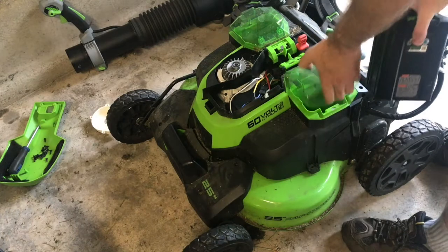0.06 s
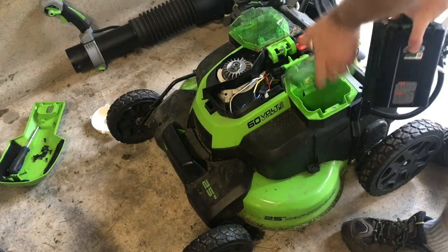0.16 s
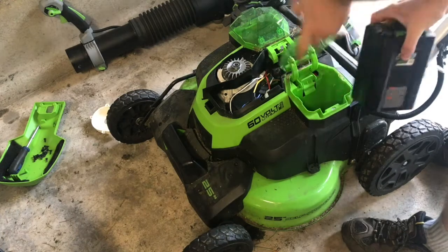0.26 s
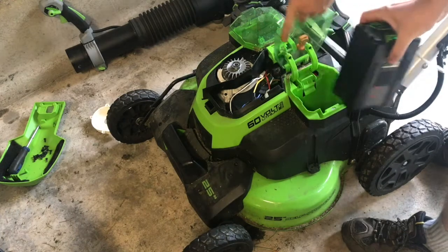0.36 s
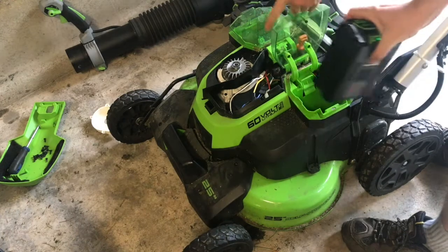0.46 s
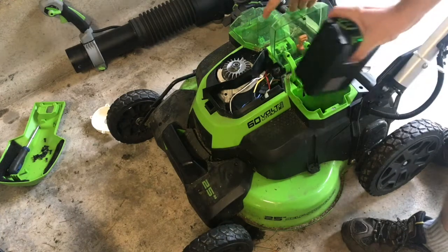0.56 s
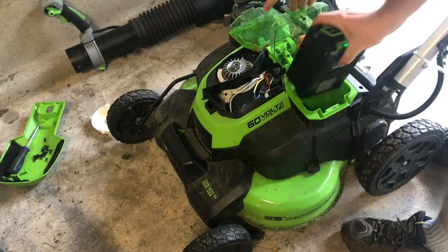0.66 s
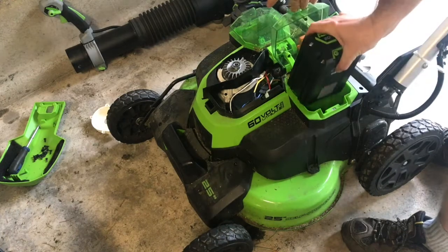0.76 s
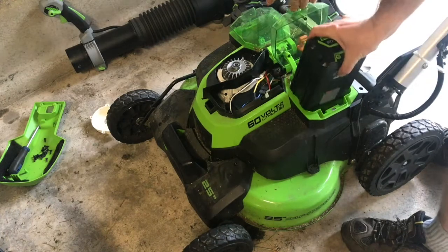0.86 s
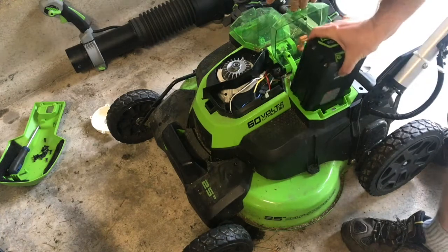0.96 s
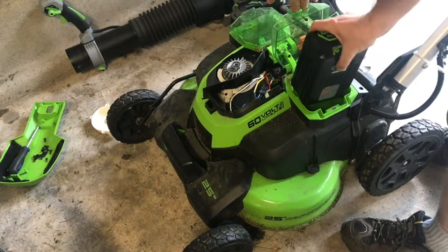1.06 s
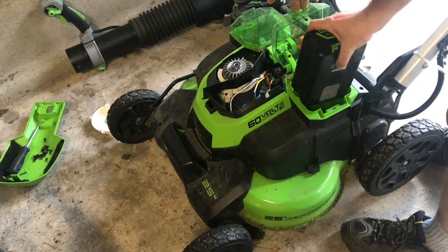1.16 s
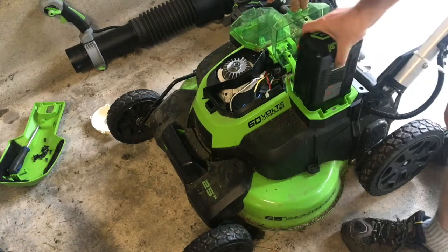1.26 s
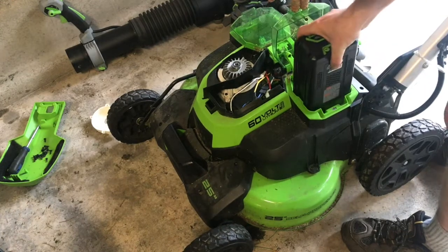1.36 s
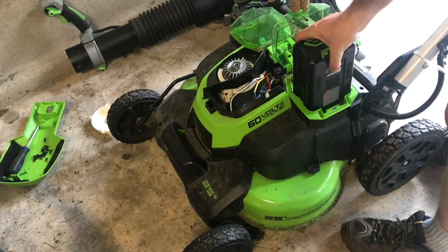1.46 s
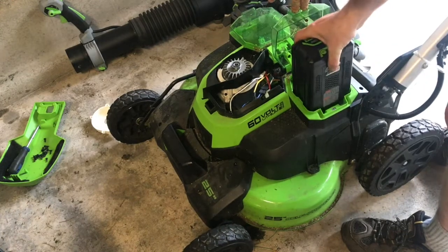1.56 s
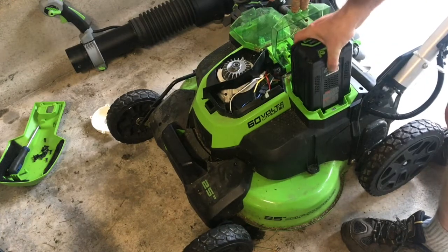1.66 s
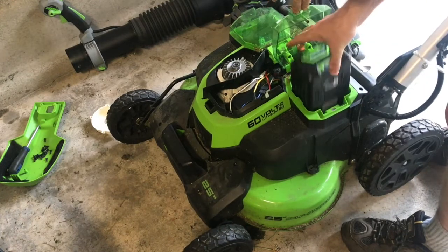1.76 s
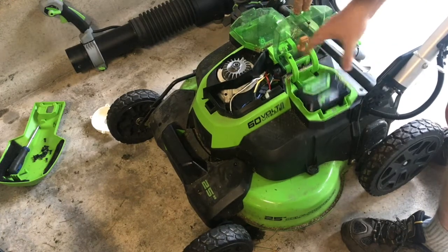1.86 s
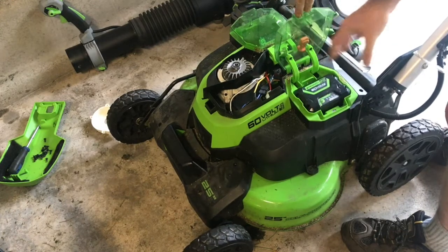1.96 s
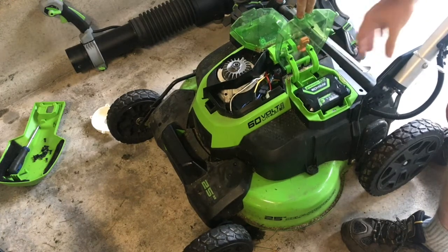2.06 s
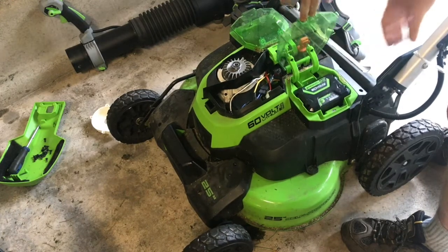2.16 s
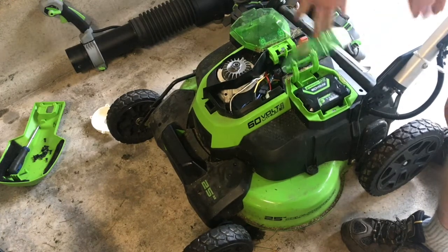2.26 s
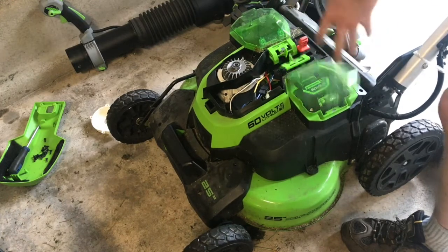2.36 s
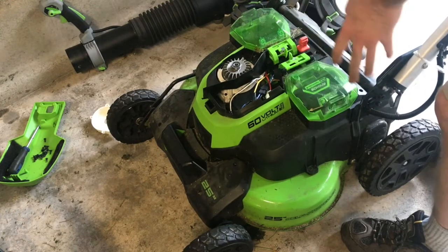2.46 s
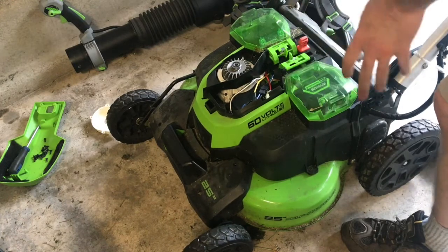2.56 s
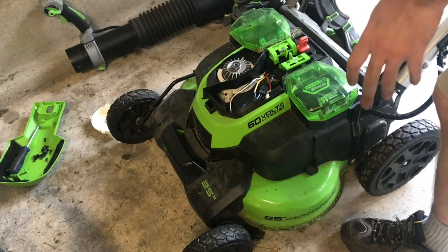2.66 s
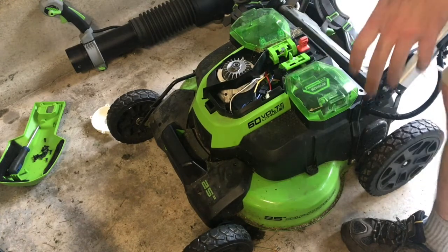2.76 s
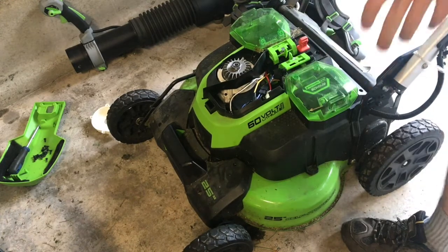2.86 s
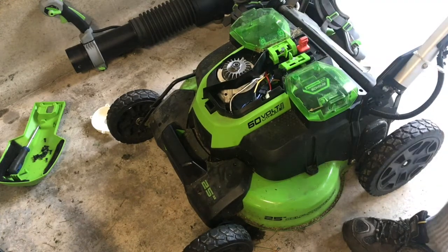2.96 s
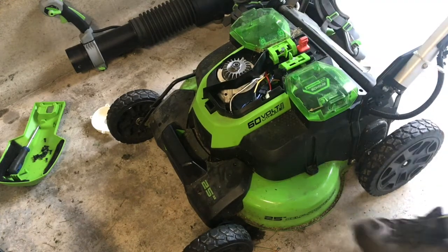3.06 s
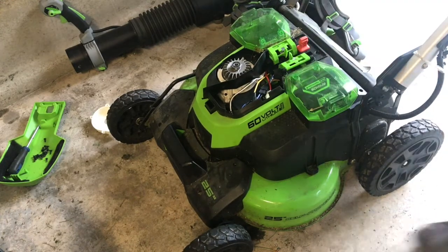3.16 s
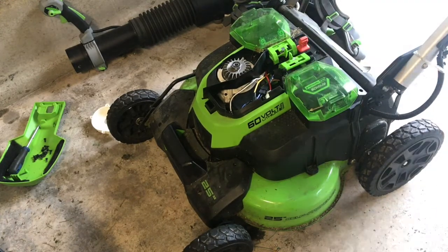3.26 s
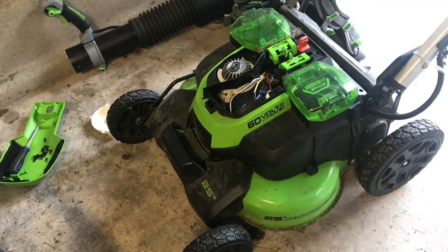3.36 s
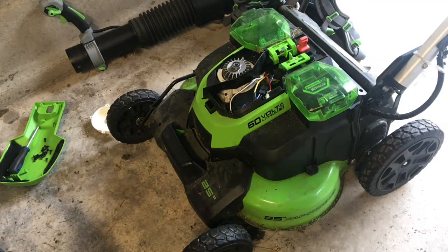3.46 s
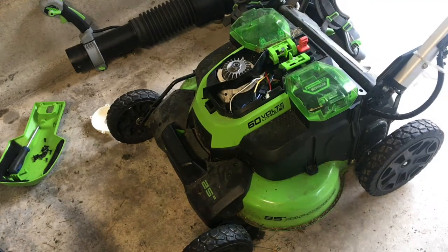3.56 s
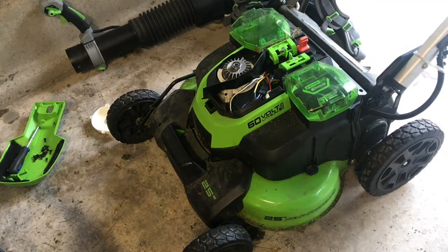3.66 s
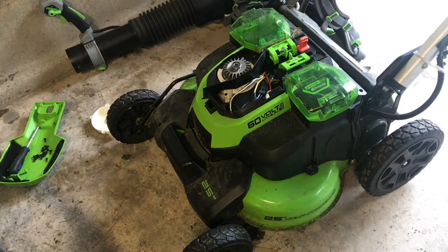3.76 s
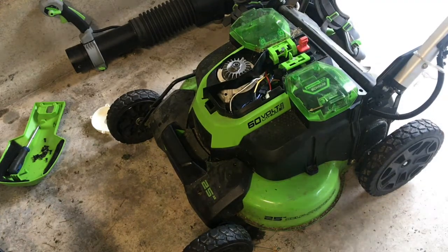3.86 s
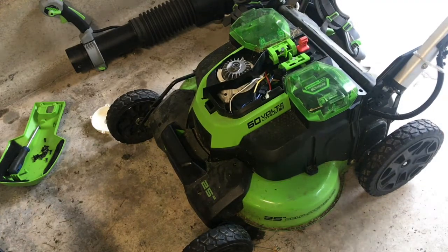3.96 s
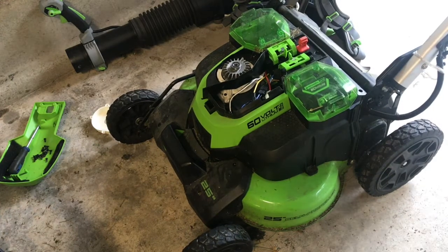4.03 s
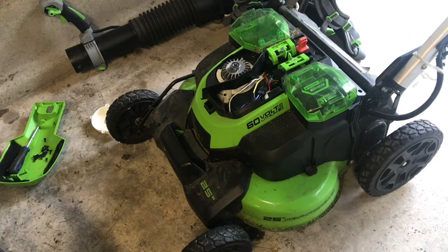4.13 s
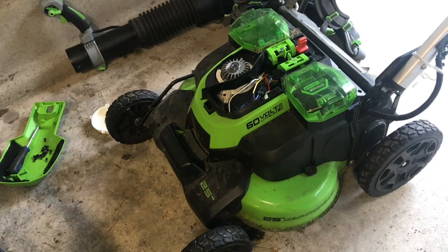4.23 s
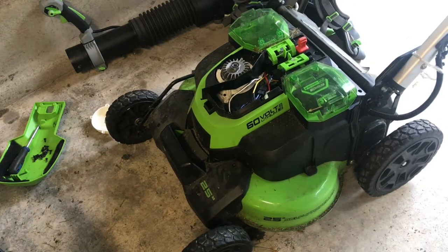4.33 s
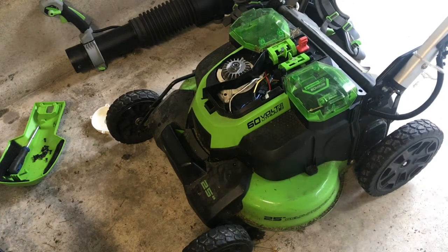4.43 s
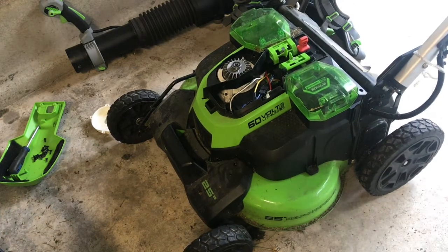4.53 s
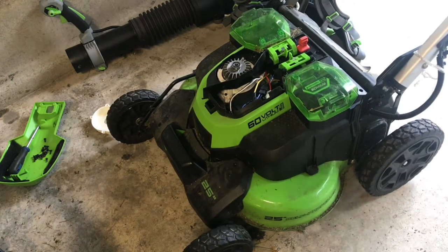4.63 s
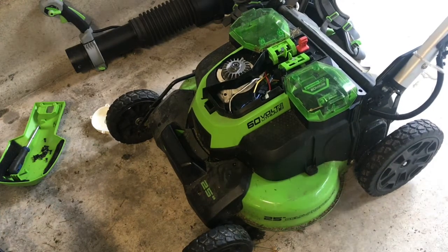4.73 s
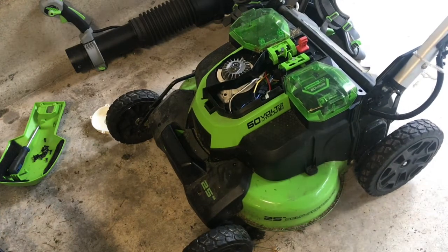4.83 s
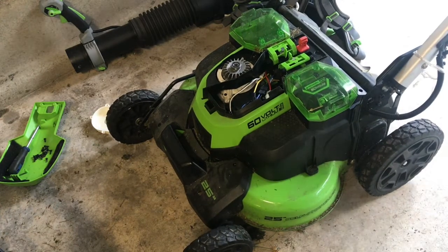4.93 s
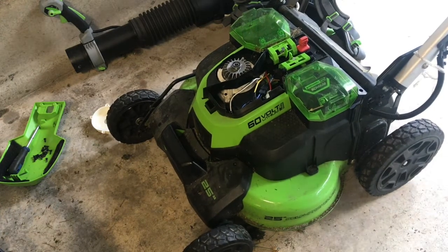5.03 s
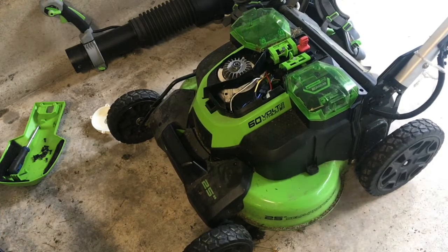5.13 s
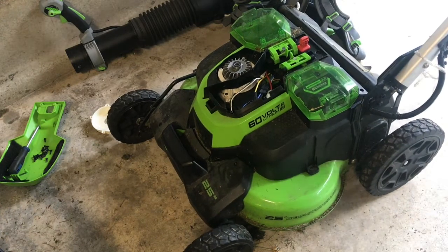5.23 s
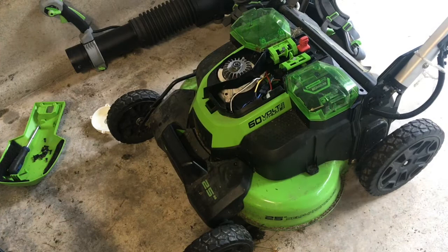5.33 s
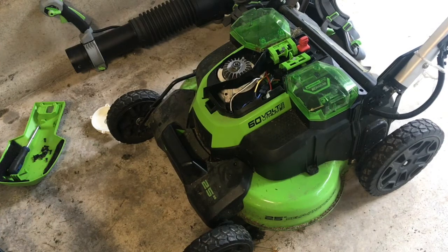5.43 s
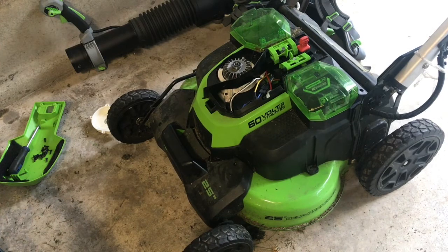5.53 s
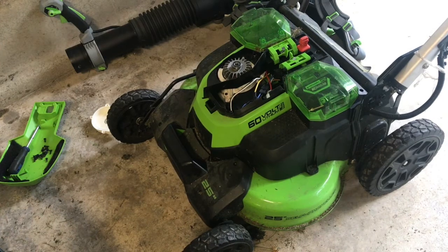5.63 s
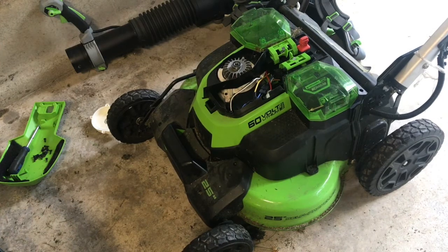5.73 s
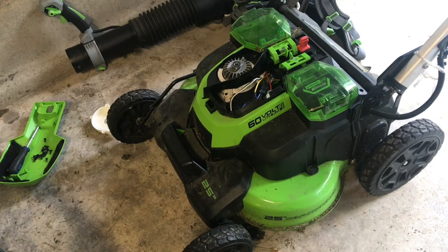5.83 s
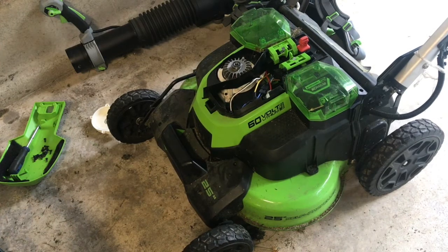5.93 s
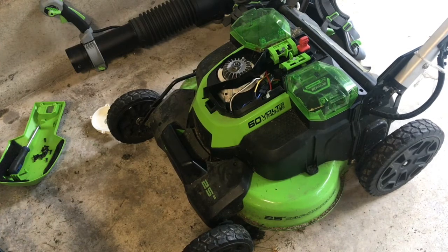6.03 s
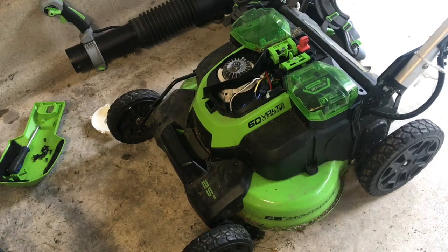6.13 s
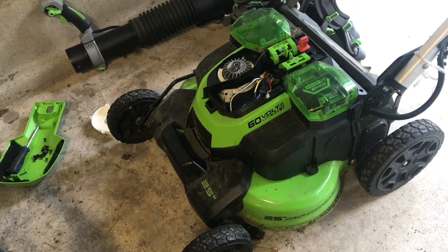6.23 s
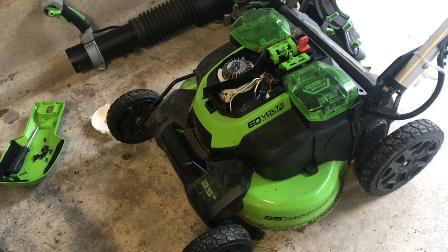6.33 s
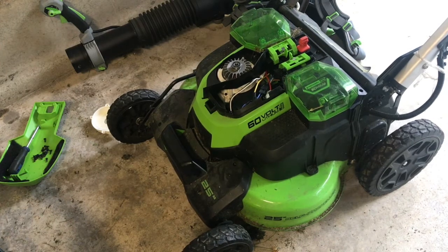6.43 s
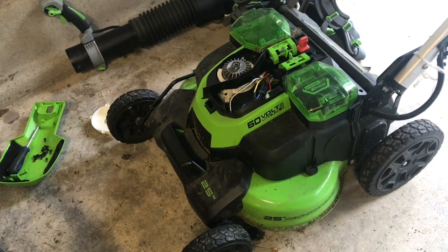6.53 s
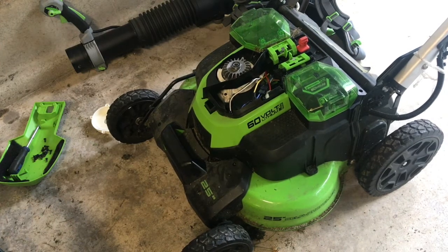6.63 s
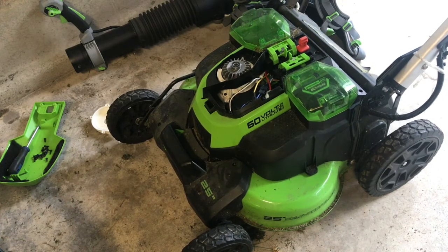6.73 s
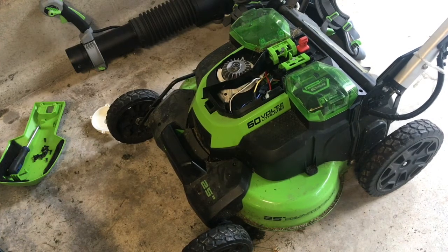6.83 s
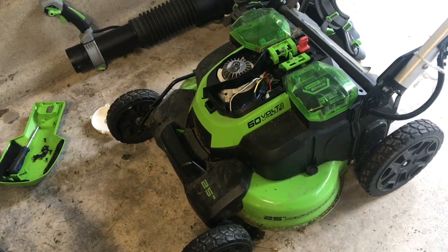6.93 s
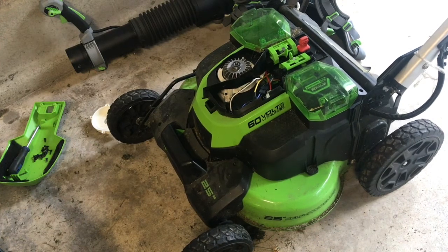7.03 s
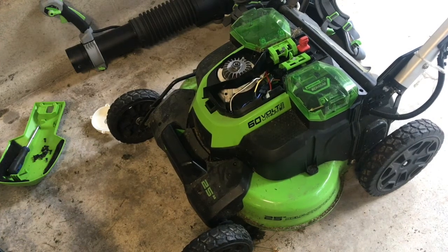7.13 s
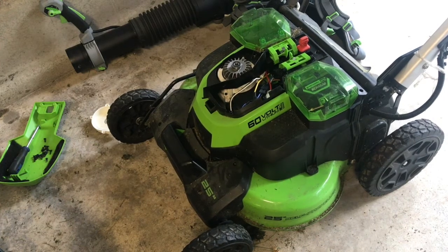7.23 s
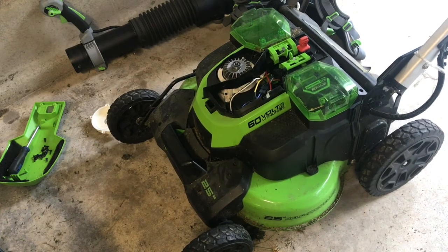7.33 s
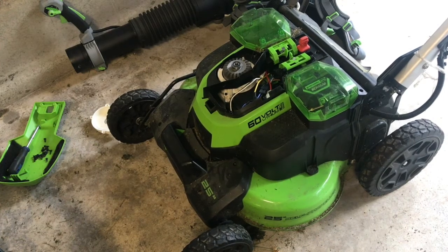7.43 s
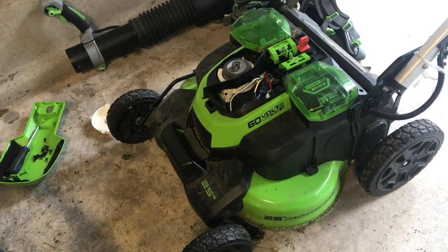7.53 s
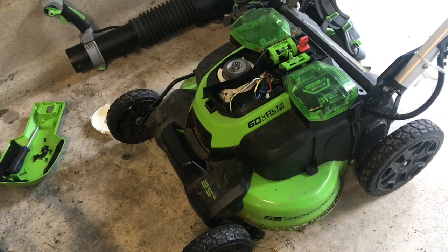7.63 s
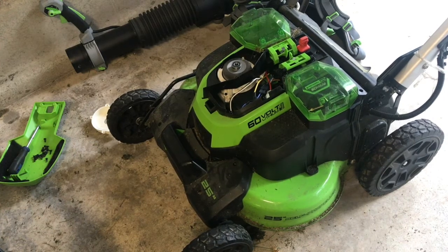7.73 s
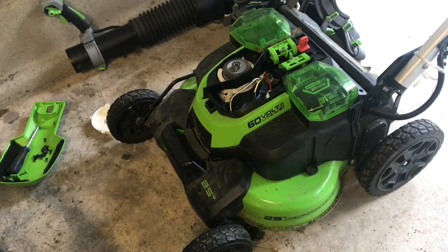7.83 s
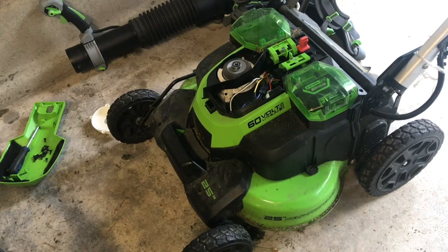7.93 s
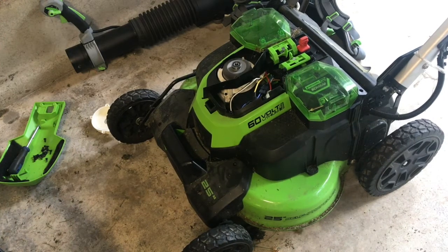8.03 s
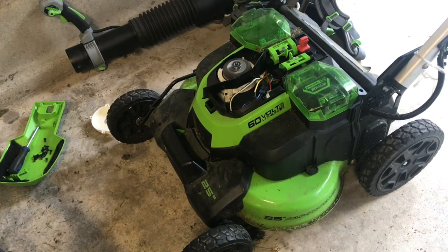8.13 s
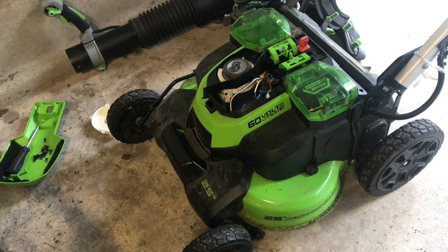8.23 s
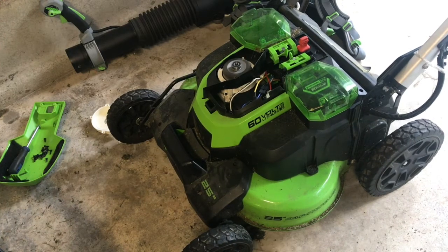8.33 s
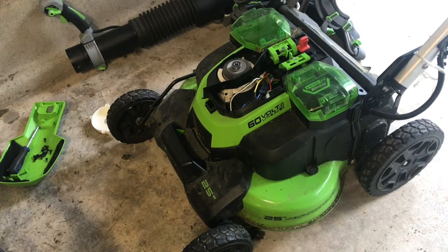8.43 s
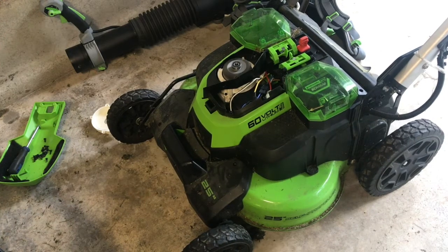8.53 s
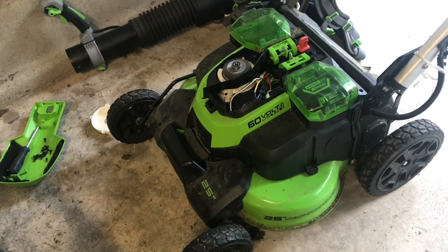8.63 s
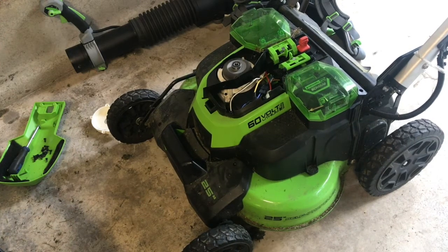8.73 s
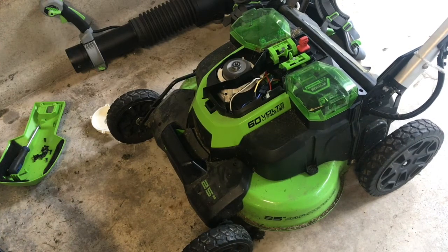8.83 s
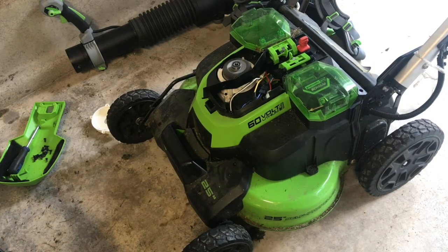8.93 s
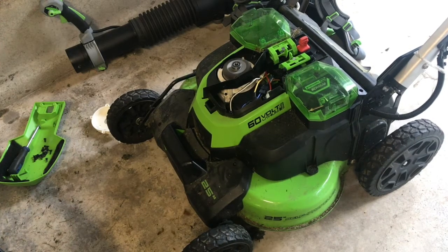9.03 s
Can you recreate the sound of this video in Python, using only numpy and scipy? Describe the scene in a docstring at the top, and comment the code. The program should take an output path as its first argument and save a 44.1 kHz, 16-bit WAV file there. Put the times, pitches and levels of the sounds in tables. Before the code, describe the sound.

A battery clunks into a mower's plastic bay and the lid slaps shut; footsteps, scuffs and handle clicks, then the motor spins up clattering.

```python
"""Over a low rumble, a drone and thin hiss, a lid flips open, a battery bumps down into its bay and latches,
and the lid slaps shut. Shoes step and scuff; the mower's handle, switch and bail click. The level steps down,
then the motor spins up: its drive clacks once a turn, ever faster, over the rising hum of the blades.
Blows are noise bursts rung through resonances, rubs are filtered grains, and the hum is a sum of sines."""
import sys
import numpy as np
from scipy import signal
from scipy.io import wavfile

SR = 44100
rng = np.random.default_rng(int(sys.argv[2]) if len(sys.argv) > 2 else 0)


def digitize_waveform(pressure):
    """Quantize a signal to 16-bit integers and store it at the path in sys.argv[1].

    Rows of a 2-D input are taken as channels; values are limited to [-1, 1].
    """
    field = np.atleast_2d(pressure).T
    bounded = np.clip(field, -1, 1)
    quanta = np.round(bounded * 32767).astype(np.int16)
    wavfile.write(sys.argv[1], SR, quanta)


N = 400869
TIME = np.arange(N) / SR  # seconds

# How a blow of hardness 0 sounds on plastic. Each row: frequency in Hz, relative level in dB.
PLASTIC_BLOW = [(30, -33.5), (90, -9), (300, -1.5), (800, -3), (1700, -4.5), (4200, -6.5), (10500, -13.5),
                (16000, -20)]
# What the handle rings with. Each row: frequency in Hz, width in Hz, height in dB.
HANDLE_RING = [(3250, 130, 0.7), (6460, 790, 7.9), (8670, 870, 6.6), (11400, 750, 8.9)]

STEP_S, STEP_DB, RUMBLE_STEP_DB = 6.89, -28, -14  # the rumble steps down less than the other early sounds
# The motor's soft start: start in s, time from there to half speed in s, steepness, speed it heads for
MOTOR_ON_S, HALF_SPEED_S, RAMP_POWER, TOP_TURNS_PER_S = 6.984, 1.122, 2.667, 77.4
ENGAGE_S = 7.35  # the running noise of the drive and the whine start here


def gain_of(db):
    """Turns decibels into amplitude."""
    return 10 ** (np.asarray(db) / 20)


def evened(x):
    """Scales a sound to rms 1."""
    return x / np.sqrt(np.mean(x ** 2) + 1e-20)


def read(points, hz):
    """Reads a table between its rows, along log frequency."""
    f, value = np.transpose(points)
    return np.interp(np.log(hz + 1), np.log(f + 1), value)


def add(mix, s, sound):
    """Mixes a sound in at time s."""
    part = mix[round(s * SR):][:len(sound)]
    part += sound[:len(part)]


def band(x, edges, order=3):
    """Keeps the frequencies between two edges, using only past samples."""
    edges = np.minimum(edges, SR / 2 - 1)
    return signal.sosfilt(signal.butter(order, edges, "band", fs=SR, output="sos"), x)


def colour(x, spectrum, peaks=(), size=8192):
    """Filters by a spectrum and its resonances, without pre-echo; white noise keeps its power."""
    hz = abs(np.fft.fftfreq(size, 1 / SR))
    db = read(spectrum, hz)
    for f, width, height in peaks:
        db = db + height / (1 + (2 * (hz - f) / width) ** 2)
    # Minimum phase: the ring starts at once and only dies away
    log_response = np.conj(signal.hilbert(np.log(gain_of(db))))
    ring = np.fft.ifft(np.exp(log_response)).real[:size // 2]
    return signal.oaconvolve(x, ring / np.linalg.norm(ring))[:len(x)]


def resonate(x, hz, width):
    """A resonance of gain 1 that follows the curve hz."""
    turn = np.exp(2j * np.pi * np.cumsum(hz) / SR)
    r = np.exp(-np.pi * width / SR)
    return 2 * (turn * signal.lfilter([1 - r], [1, -r], x / turn)).real


def noise():
    """White noise of rms 1."""
    return rng.standard_normal(N)


def drift(per_s):
    """Slow random wandering of rms 1, with this many new values a second."""
    knots = np.arange(0, 10, 1 / per_s)
    return evened(np.interp(TIME, knots, noise()[:len(knots)]))


def swell(s, length, db, edge_s):
    """Rises to a level at time s, holds for the length and fades; each edge covers 20 dB in edge_s."""
    outside = np.maximum(abs(TIME - s - length / 2) - length / 2, 0)
    return gain_of(db - 20 * np.minimum(outside / edge_s, 10))


def stroke(s, length, db):
    """The envelope of a rub: longer strokes start and stop more gently."""
    return swell(s, length, db, 0.021 + 0.14 * length)


def garage(early_db, tail_db, early_t60=0.2):
    """The room's answer to a click: quick reflections off floor and walls, and a longer tail."""
    # How long the tail takes to fade by 60 dB. Each row: frequency in Hz, time in seconds.
    fade_times = [(100, 0.46), (400, 0.49), (800, 0.74), (3000, 0.67), (6000, 0.6), (10000, 0.36),
                  (16000, 0.12)]
    t = np.arange(SR) / SR
    first, late = rng.standard_normal((2, SR)) * (t > .005)
    early = evened(first * gain_of(-60 * t / early_t60))
    hz, frame_s, z = signal.stft(late, SR, nperseg=256)
    fade = gain_of(-60 * frame_s / read(fade_times, hz)[:, None])
    tail = evened(signal.istft(z * fade, SR, nperseg=256)[1][:SR])
    return (gain_of(tail_db) * tail + gain_of(early_db) * early) / np.sqrt(SR)


def echoed(x, room):
    """A sound with its reflections."""
    return x + signal.oaconvolve(x, room)[:N]


def blows(rows, spectrum, resonances, t60, crack, early_db, tail_db):
    """A crack, a short dense clatter and echoes, rung through the object; a harder blow is brighter."""
    out, t = np.zeros(N), np.arange(SR) / SR
    for s, db, hardness in rows:
        contact = rng.standard_normal(SR) * (gain_of(-60 * t / t60) + crack * np.exp(-t / 0.0009))
        contact /= np.linalg.norm(contact)
        # Hardness tilts the treble above 300 Hz
        tilted = [(hz, height + hardness * np.log2(max(hz / 300, 1))) for hz, height in spectrum]
        sound = colour(contact + garage(early_db, tail_db), tilted, resonances)
        add(out, s, gain_of(db) * sound / np.std(sound[:SR // 50]))  # level set over the first 20 ms
    return out


def grains():
    """Sparse grains of uneven size, as when grit is crushed or rails rub."""
    sizes_db = 1.5 * rng.exponential(1, N).clip(0, 5)
    sparse = noise() * gain_of(sizes_db) * (rng.random(N) < .2)
    return evened(sparse) * gain_of(2.1 * drift(150))


def level_step():
    """Goes from 0 to 1 within 9 ms and stays there: the step down in level."""
    return np.clip((TIME - STEP_S) / 0.009 + 1, 0, 1)


def rumble():
    """Low outdoor rumble: noise with most of its power in the bass, stepping down once."""
    # Each row: frequency in Hz, relative level in dB.
    rumble_colour = [(20, -26.5), (40, -6.5), (60, 1), (90, -4), (140, 3), (175, -4.5), (300, -11.5),
                     (550, -17), (1000, -25), (2000, -35), (5000, -59)]
    return colour(noise(), rumble_colour) * gain_of(-55 + RUMBLE_STEP_DB * level_step())


def background():
    """Thin hiss, and a far drone with a faint whistle and a wavering hum that swells now and then."""
    # The colours of drone and hiss. Each row: frequency in Hz, relative level in dB.
    drone_colour = [(100, -20.5), (200, -0.5), (330, 7.5), (520, -1), (590, -8), (900, -16.5), (1300, -25),
                    (3000, -41.5)]
    hiss_colour = [(700, -0.5), (1500, -2.5), (3500, -4), (4500, -0.5), (5200, -6), (7000, -7),
                   (8200, -5.5), (10000, -13), (13000, -10), (16000, -12.5)]
    # Loudness of the drone before the step. Each row: time in seconds, level in dB.
    drone_level = [(0, -60.5), (.5, -66.5), (1.4, -61.5), (3, -72.5), (4.7, -71), (5.2, -59), (6.9, -58)]
    # Swells of the hum before the step. Each row: start in seconds, length in seconds, level in dB.
    hum_swells = [(0.463, 0.26, -59), (3.49, 0.086, -71.5), (5.147, 0.36, -63.5), (5.88, 3.1, -60)]
    whistle = gain_of(-24) * evened(resonate(noise(), np.full(N, 4480), 160))
    drone_db = np.interp(TIME, *np.transpose(drone_level))
    drone = (colour(noise(), drone_colour) + whistle) * gain_of(drone_db)
    hum_hz = 490 + 2.5 * drift(25)
    hum = np.sqrt(2) * np.sin(2 * np.pi * np.cumsum(hum_hz) / SR) * gain_of(1.5 * drift(5.9))
    hum *= sum(swell(*row, edge_s=0.2) for row in hum_swells)
    hiss = gain_of(-68) * colour(noise(), hiss_colour)
    return drone + hum + hiss


def plastic_rubs():
    """Plastic rubs on plastic as the lid opens and the battery slides down its rails: grains in a band."""
    # Each row: start in seconds, length in seconds, level in dB.
    rubs = [(0.124, 0.057, -59.5), (0.698, 0.027, -50.5), (1.338, 0.022, -59.5), (1.67, 0.1, -37)]
    rails = evened(band(grains(), (700, 7000), order=1))
    rails *= sum(stroke(*row) for row in rubs)
    return echoed(rails, garage(early_db=-10, tail_db=-11))


def lid():
    """The lid is flipped open, later slapped shut; each blow rings the plastic."""
    # Each row: start in seconds, level in dB, hardness as treble tilt in dB per octave.
    hits = [(0.134, -52.5, 1.5), (0.207, -52, -1), (2.308, -46, -1.5), (2.331, -12.5, 1.7),
            (2.336, -13, -3.5)]
    # A blow of hardness 0. Each row: frequency in Hz, relative level in dB.
    lid_blow = [(30, -34), (90, -18.5), (300, -1.5), (1200, -0.5), (4200, -7), (10500, -16), (16000, -24.5)]
    # What the lid rings with. Each row: frequency in Hz, width in Hz, height in dB.
    lid_ring = [(158.2, 20, 10), (315, 35, 8), (611.5, 110, 6.5), (722, 17, 13), (810, 110, 10),
                (1035, 120, 3.1), (1780, 90, 2.6), (3400, 590, 3.5), (6050, 2200, 3)]
    return blows(hits, lid_blow, lid_ring, t60=0.097, crack=0.59, early_db=-5, tail_db=-11.5)


def battery():
    """The battery finds its bay, slides down and latches; each knock rings the housing."""
    # Each row: start in seconds, level in dB, hardness as treble tilt in dB per octave.
    knocks = [(0.651, -29.5, -1), (0.686, -28, -8), (0.785, -33.5, -1.5), (0.794, -27.5, -7.5),
              (0.942, -48, -2.5), (0.986, -31.5, -2.23), (1.113, -41, -4.5), (1.292, -36.5, -3),
              (1.313, -27.5, -5.5), (1.518, -50.5, -9), (1.66, -26.5, -4.5), (1.668, -16.5, -2),
              (1.743, -26.5, -6.5), (1.791, -25, 0.2), (1.801, -20, 2.5), (1.821, -13.5, 0.46),
              (1.842, -26.5, -3.5), (1.887, -29.5, -2.5)]
    # What the housing rings with. Each row: frequency in Hz, width in Hz, height in dB.
    housing_ring = [(104, 11, 7), (192, 40, 4), (308, 26, 9.5), (380, 160, 5), (553, 180, 7.5),
                    (900, 410, 5), (1110, 59, 3.5), (3900, 1000, 2), (6040, 1300, 4)]
    return blows(knocks, PLASTIC_BLOW, housing_ring, t60=0.053, crack=0.55, early_db=-5, tail_db=-14)


def footsteps():
    """Shoes step on concrete: short blows rung through the floor."""
    # Each row: start in seconds, level in dB, hardness as treble tilt in dB per octave.
    footfalls = [(2.771, -45.5, -3.3), (3.288, -38.5, 2), (3.735, -46.5, -2), (4.693, -38, -1.5),
                 (5.587, -47.5, -3.5), (6.835, -51, -15)]
    # A blow of hardness 0. Each row: frequency in Hz, relative level in dB.
    floor_blow = [(30, -40), (90, 1.5), (300, -2), (1000, -5.5), (4200, -6), (10500, -11), (16000, -23)]
    # What the floor rings with. Each row: frequency in Hz, width in Hz, height in dB.
    floor_ring = [(153, 18, 16.5), (202, 60, 3), (510, 62, 9.1), (638, 85, 8.4), (817, 72, 4.8),
                  (1040, 200, 7.8), (3060, 860, 1.3)]
    return blows(footfalls, floor_blow, floor_ring, t60=0.06, crack=0.3, early_db=-4, tail_db=-8)


def scuffs():
    """Soles drag on concrete: crushed grit with a rasp that rises in pitch as the sole speeds up."""
    # Each row: start in seconds, length in seconds, level in dB.
    drags = [(2.8, 0.015, -50.5), (2.95, 0.079, -58.5), (3.309, 0.031, -44), (3.763, 0.036, -50),
             (3.865, 0.023, -50), (4.085, 0.21, -37), (4.641, 0.031, -49.5), (4.897, 0.085, -56.5),
             (5.225, 0.033, -55.5), (5.31, 0.018, -49), (6.418, 0.011, -53.5), (6.758, 0.019, -48)]
    # The colour of crushed grit. Each row: frequency in Hz, relative level in dB.
    grit_colour = [(100, -6), (400, -15), (800, -5), (1400, -6), (2300, 0), (4200, -2), (5200, -3.5),
                   (7000, -7), (10000, -13.5), (16000, -22)]
    mid_rasp_hz, rasp_rise_hz_per_s = 2960, 5200
    grit, soles = colour(grains(), grit_colour), np.zeros(N)
    for s, length, db in drags:
        from_middle_s = np.clip(TIME - s - length / 2, -length / 2, length / 2)
        rasp = resonate(grit, mid_rasp_hz + rasp_rise_hz_per_s * from_middle_s, 700)
        soles += evened(grit + 0.8 * rasp) * stroke(s, length, db)
    return echoed(soles, garage(early_db=-10, tail_db=-11))


def handle():
    """Knocks and clicks of the handle, its switch and bail, each with a ring of its own."""
    # Each row: start in seconds, level in dB, hardness as treble tilt in dB per octave, ring in Hz.
    clicks = [(3.892, -31.5, 3.6, 4060), (3.985, -42, -4.5, 770), (4.176, -31.5, -1, 3100),
              (4.646, -35.5, 2.1, 4350), (5.0434, -29.5, 1, 3530), (6.111, -40, 1, 5240),
              (6.187, -41, -4.5, 830), (6.461, -31.5, 5, 4080), (6.773, -36.5, 3.5, 4300)]
    # A blow of hardness 0. Each row: frequency in Hz, relative level in dB.
    handle_blow = [(30, -37), (90, -18), (300, -3.5), (1200, 3), (4200, 3), (9500, -8.5), (11000, -14),
                   (16000, -14)]
    out = np.zeros(N)
    for *click, ring_hz in clicks:
        ring = HANDLE_RING + [(ring_hz, 550, 9)]  # Hz, width in Hz, height in dB
        out += blows([click], handle_blow, ring, t60=0.042, crack=0.36, early_db=-6, tail_db=-12.5)
    return out


def shaft_speed():
    """Turns a second: the controller ramps the motor up gently, along an S-curve."""
    ramp = (np.maximum(TIME - MOTOR_ON_S, 0) / HALF_SPEED_S) ** RAMP_POWER
    return TOP_TURNS_PER_S * ramp / (1 + ramp)


def blades(speed):
    """Two blade tips pass each turn, so the second order leads the hum; it grows steeply with speed."""
    # Each row: multiple of the shaft speed, relative level in dB.
    orders = [(1, -17), (2, 1), (3, -36), (4, -25), (6, -7)]
    top_speed_db, growth_db_per_decade = -40.5, 64
    boom_hz, boom_width_hz, peak_boom_db = 103, 9.5, 10  # a deck resonance the hum sweeps through
    turns, hum = np.cumsum(speed) / SR, np.zeros(N)
    for k, db in orders:
        boom_db = peak_boom_db / (1 + (2 * (k * speed - boom_hz) / boom_width_hz) ** 2)
        tone = np.sin(2 * np.pi * (k * turns + rng.random()))
        hum += gain_of(db + boom_db + 1.1 * drift(6.6)) * tone
    growth = (speed / TOP_TURNS_PER_S) ** (growth_db_per_decade / 20)
    return np.sqrt(2) * hum * gain_of(top_speed_db) * growth


def controller():
    """The motor controller's relay clicks and its thin switching whine, a wavering sine, sets in."""
    # Each row: start in seconds, level in dB, hardness as treble tilt in dB per octave.
    relay_clicks = [(7.265, -63.5, 0.8), (7.327, -73, -2.5)]
    whine = gain_of(-71) * np.sin(2 * np.pi * np.cumsum(12020 + 45 * drift(200)) / SR)
    fade_in = np.clip((TIME - ENGAGE_S) / 0.1, 0, 1)
    relay = blows(relay_clicks, PLASTIC_BLOW, HANDLE_RING, t60=0.038, crack=0.71, early_db=-7, tail_db=-8)
    return relay + whine * fade_in


def clack_shaking(speed):
    """Slack in the drive clacks once a turn and rebounds; this is how the deck shakes, at rms 1 when fast."""
    clack_angle_turns = 0.545
    loose_turns_per_s = 35  # the clacks grow uneven up to this speed
    decay_s, slow_decay_turns = 0.0077, 0.1  # at low speed a clack drags on for this share of a turn
    turns = np.cumsum(speed) / SR
    at = np.flatnonzero(np.diff(np.floor(turns - clack_angle_turns)) > 0)
    t, shaking = np.arange(SR // 10) / SR, np.zeros(N)
    for i, chance in zip(at, rng.uniform(-1.18, 1, (len(at), 3))):
        late, size, gap = chance * min(speed[i] / loose_turns_per_s, 1) ** 2
        clack = np.exp(-t / max(decay_s, slow_decay_turns / speed[i])) - np.exp(-t / 0.00087)
        s = i / SR + .004 * late
        add(shaking, s, gain_of(4.5 * size) * clack)
        add(shaking, s + .014 + .007 * gap, .55 * gain_of(-3 * size) * clack)  # rebound
    return shaking / np.sqrt(np.mean(shaking[speed > loose_turns_per_s] ** 2))


def loudness(speed, db, half_speed, steepness, easing_db):
    """Drive noise grows with speed, levels off, then eases as the spin steadies the parts."""
    growth = (speed / half_speed) ** steepness
    return (TIME > ENGAGE_S) * gain_of(db - easing_db * speed) * growth / (1 + growth)


def drive(speed):
    """The drive takes up its slack, then grinds and rattles through the deck with each clack."""
    # Each row: start in seconds, level in dB, hardness as treble tilt in dB per octave.
    first_clacks = [(7.351, -54.5, -1), (7.383, -48.5, -6), (7.429, -50, -4), (7.465, -46.5, -2),
                    (7.508, -47, -1), (7.528, -35.5, -3), (7.62, -34.5, 1)]
    # The deck's colour when running, and for a blow of hardness 0.
    # Each row: frequency in Hz, relative level in dB.
    deck_colour = [(82, -33), (140, -8.5), (309, -9), (342, -11.5), (518, -0.5), (755, -5), (1190, -3),
                   (1540, -9), (1740, -6), (2790, -10), (3480, -12.5), (6960, -13), (10300, -24.5),
                   (12900, -23.5), (16000, -34)]
    deck_blow = [(30, -34.5), (90, -12), (300, 1.5), (1200, -2), (4200, -7.5), (10500, -19), (16000, -28.5)]
    # What the deck rings with. Each row: frequency in Hz, width in Hz, height in dB.
    deck_ring = [(219, 13, 13.5), (315, 9.7, 12), (558, 190, 3), (634, 68, 0.5), (902, 210, 7.5),
                 (1154, 70, 4.5), (1727, 76, 5.5), (2166, 70, 2.5), (3395, 250, 8), (3825, 380, 7.5),
                 (4490, 130, 7)]
    # How the low and the high noise follow the speed. In order: level in dB before easing,
    # turns a second at half strength, steepness, easing in dB per turn a second.
    grind_growth = (-27.5, 17, 2.5, 0.1078)
    rattle_growth = (-24, 13, 5.5, 0.1434)
    shaking = clack_shaking(speed)
    grind = colour(noise() * (0.77 + 0.51 * shaking), deck_colour, deck_ring)
    grind = band(grind, (135, 1900), order=5)
    rattle = colour(noise() * (.15 + .85 * shaking), deck_colour, deck_ring)
    rattle = band(rattle, (1900, 20000), order=5)
    running = grind * loudness(speed, *grind_growth) + rattle * loudness(speed, *rattle_growth)
    starting = blows(first_clacks, deck_blow, deck_ring, t60=0.1, crack=0.21, early_db=-8, tail_db=-7.5)
    return echoed(running, garage(early_db=-16, tail_db=-9.5)) + starting


def scene():
    """All sources; background and handling step down in level, the rumble less, the motor not at all."""
    handling = plastic_rubs() + lid() + battery() + footsteps() + scuffs() + handle()
    before_motor = gain_of(STEP_DB * level_step()) * (background() + handling)
    speed = shaft_speed()
    motor = blades(speed) + controller() + drive(speed)
    return (rumble() + before_motor + motor)[None]


def record(dry):
    """Flattens the loudest peaks smoothly towards 0.95 of full scale, then cuts the top treble."""
    held = dry / (1 + (abs(dry) / .95) ** 6) ** (1 / 6)
    low_pass = signal.firwin(511, 16200, window=("kaiser", 9), fs=SR)  # cutoff in Hz
    return signal.oaconvolve(held, low_pass[None], "same")


dry = scene()
out = record(dry)
digitize_waveform(out)
```